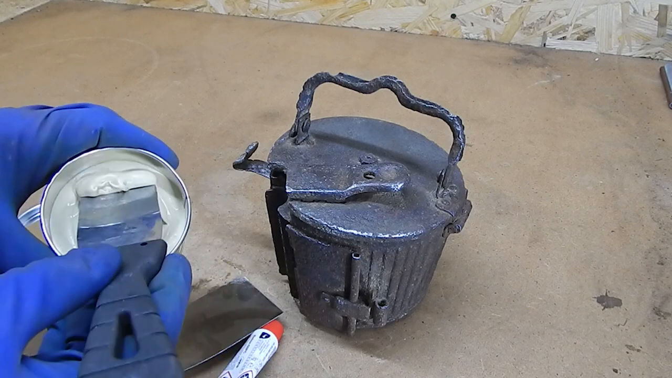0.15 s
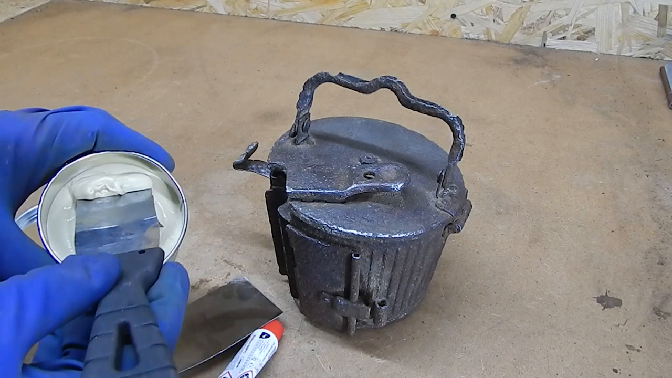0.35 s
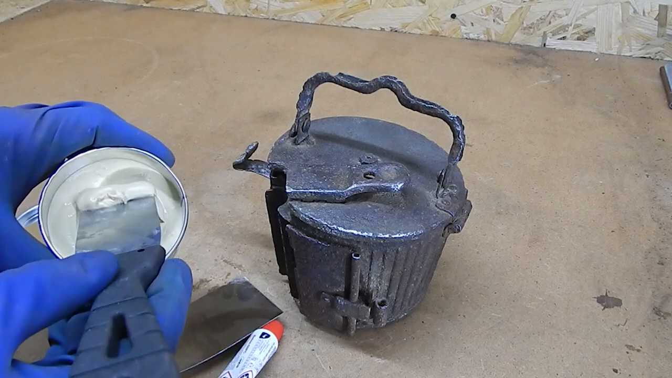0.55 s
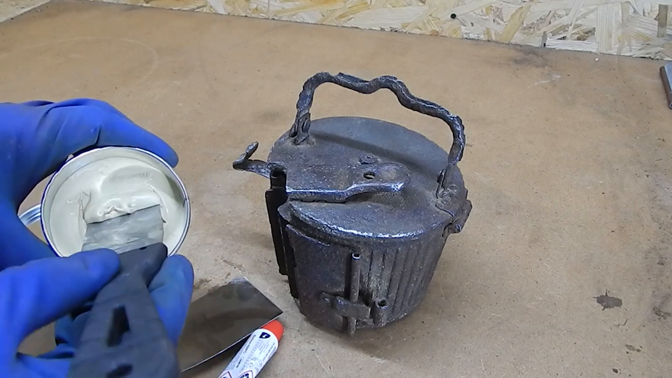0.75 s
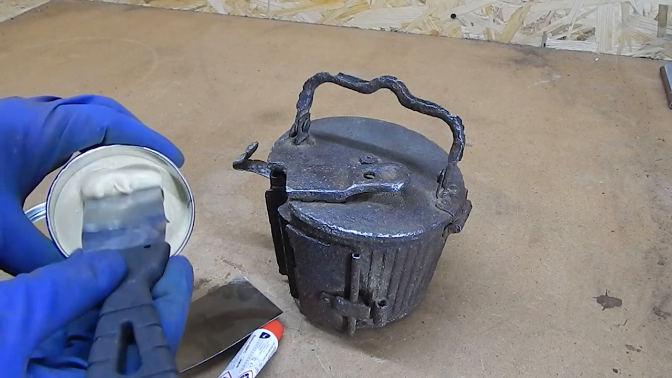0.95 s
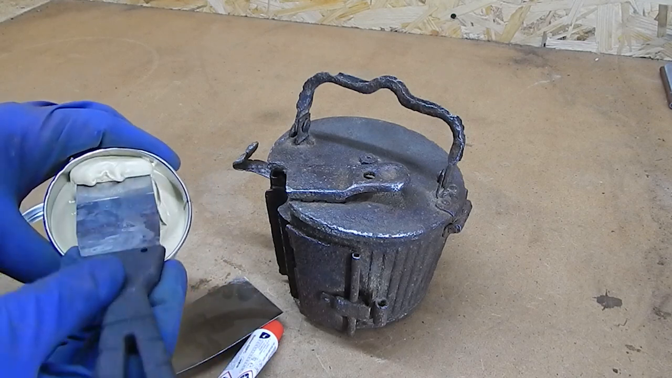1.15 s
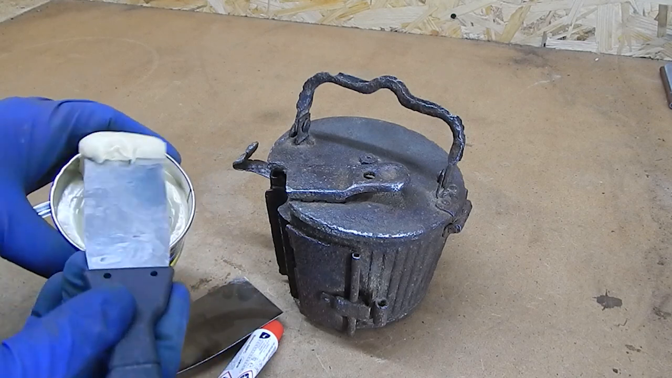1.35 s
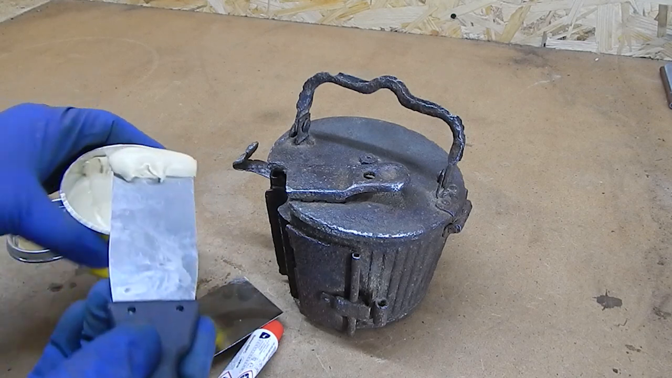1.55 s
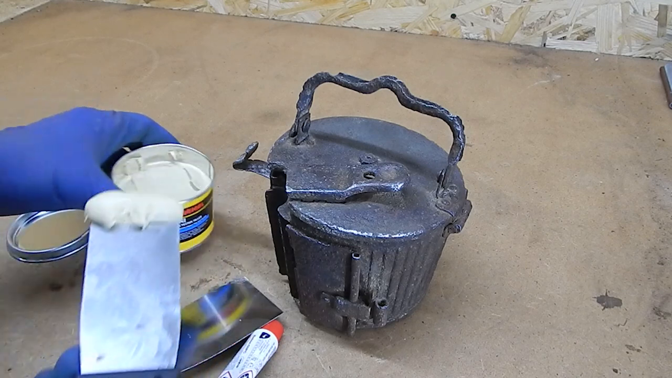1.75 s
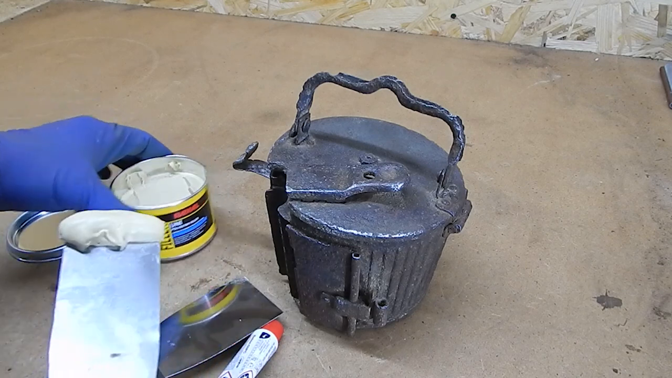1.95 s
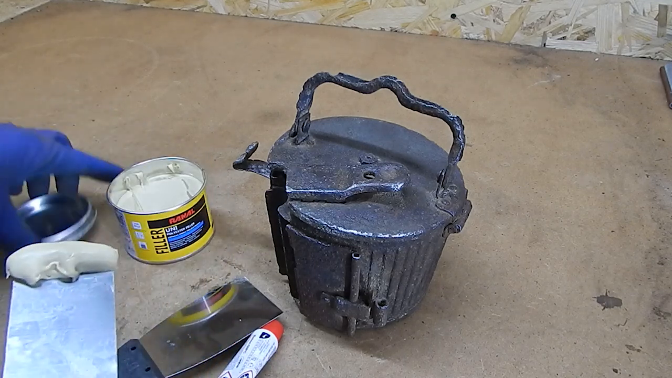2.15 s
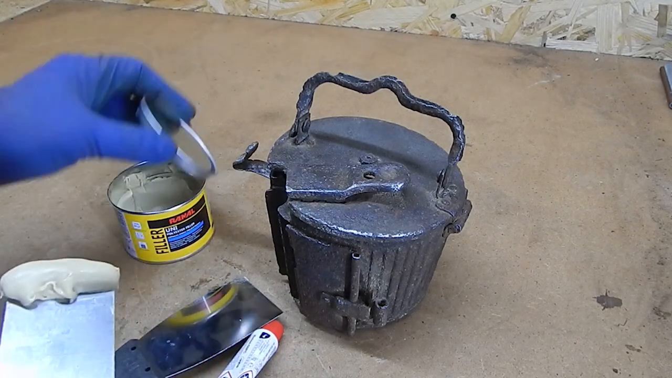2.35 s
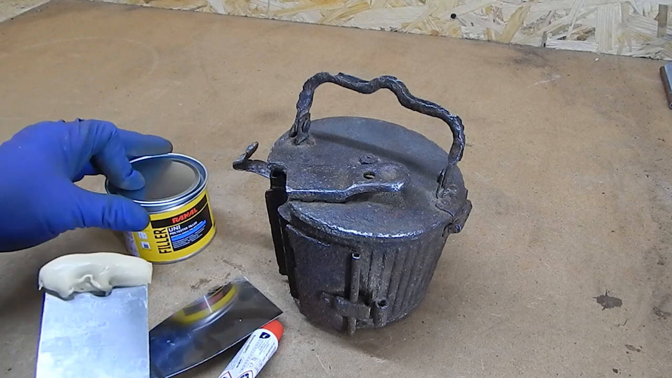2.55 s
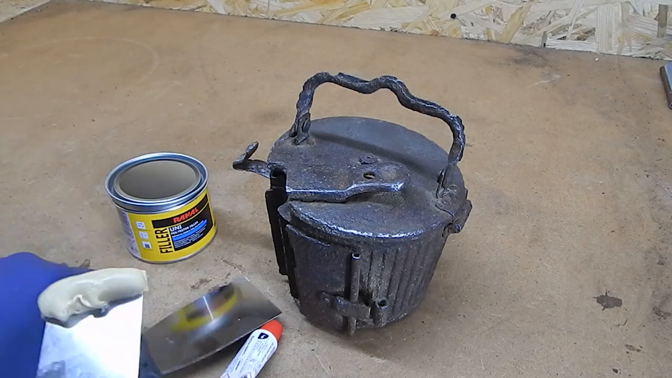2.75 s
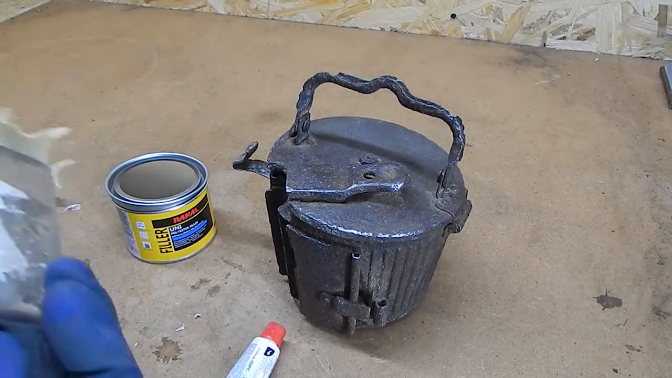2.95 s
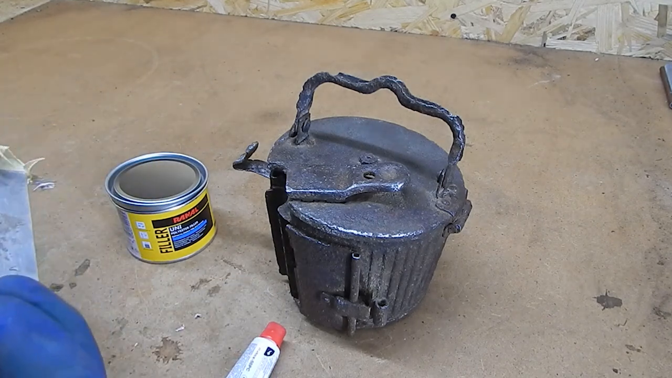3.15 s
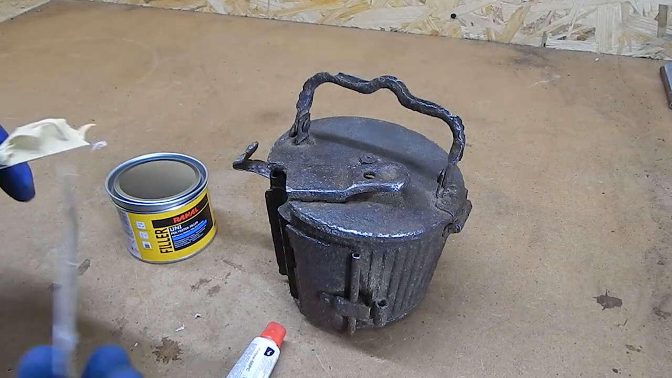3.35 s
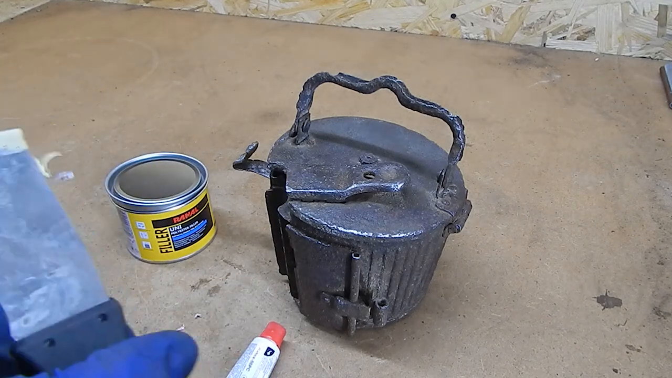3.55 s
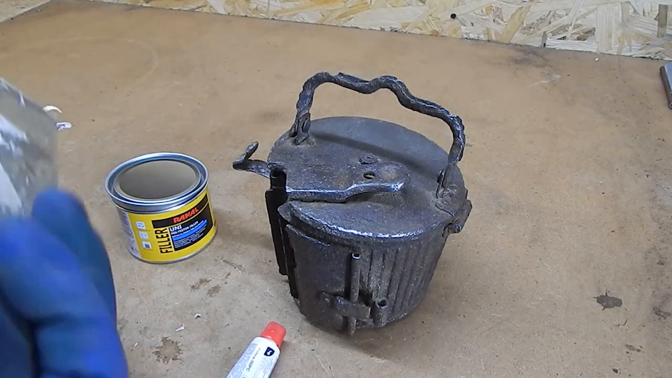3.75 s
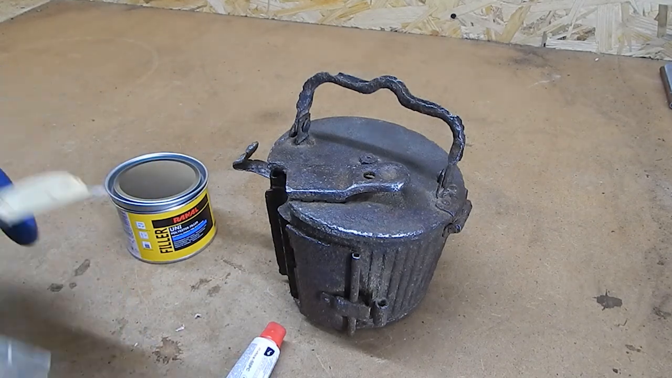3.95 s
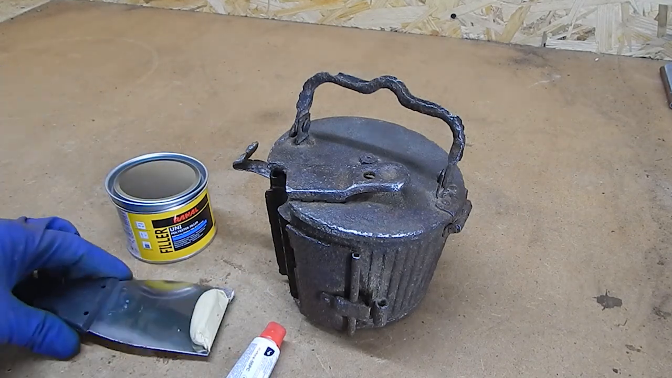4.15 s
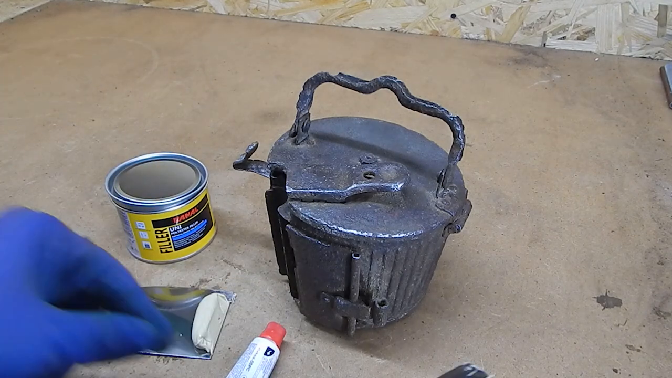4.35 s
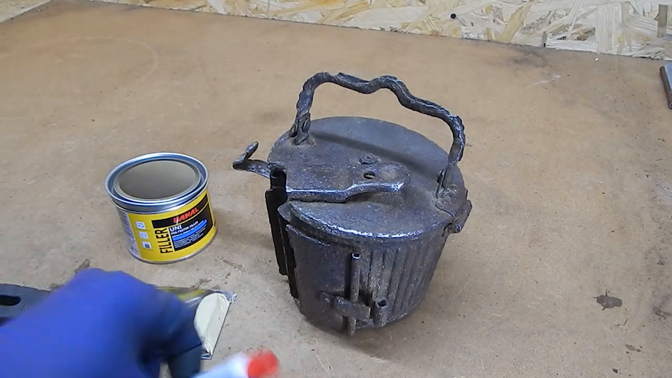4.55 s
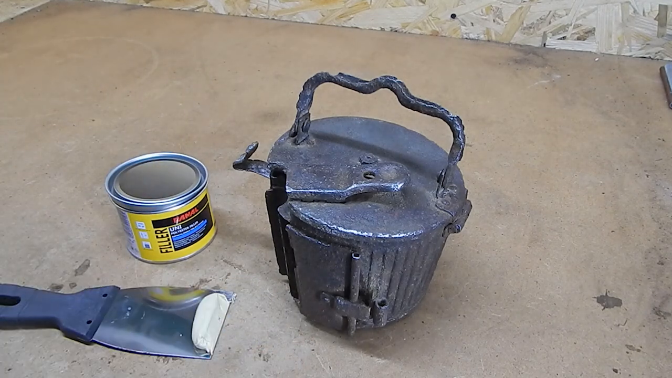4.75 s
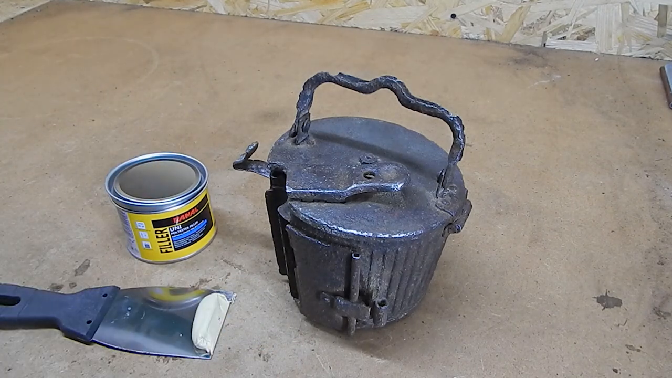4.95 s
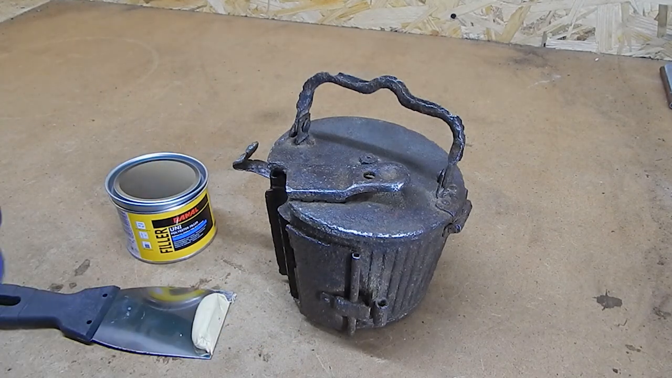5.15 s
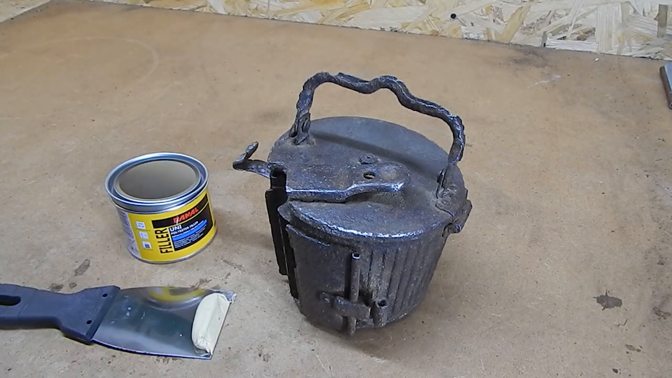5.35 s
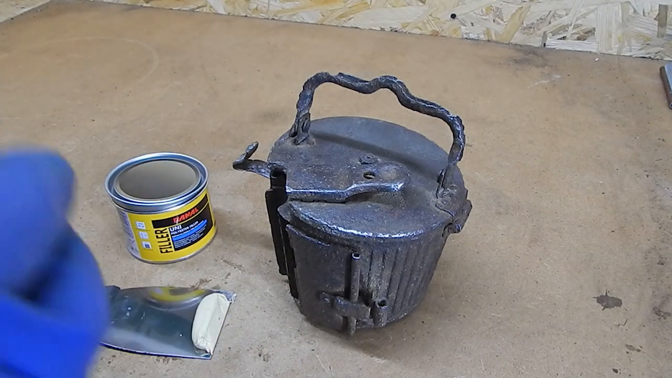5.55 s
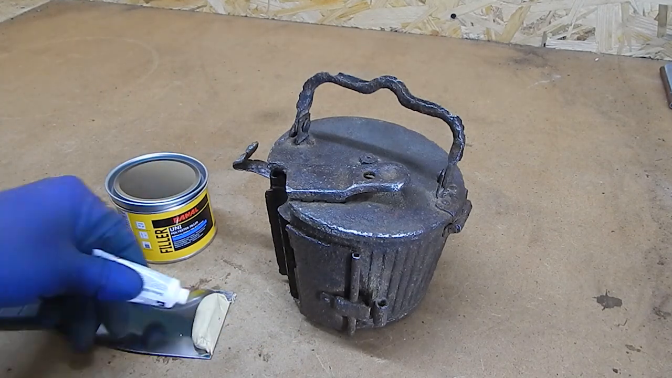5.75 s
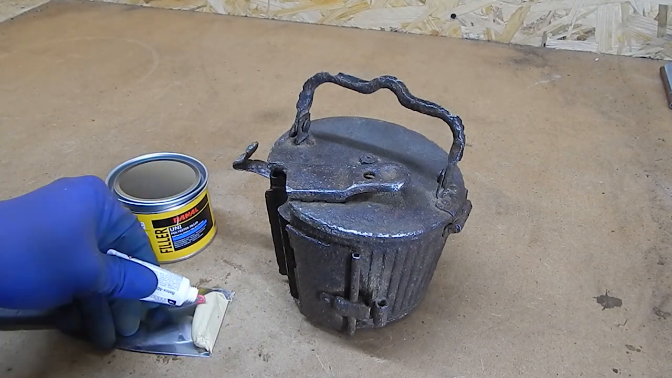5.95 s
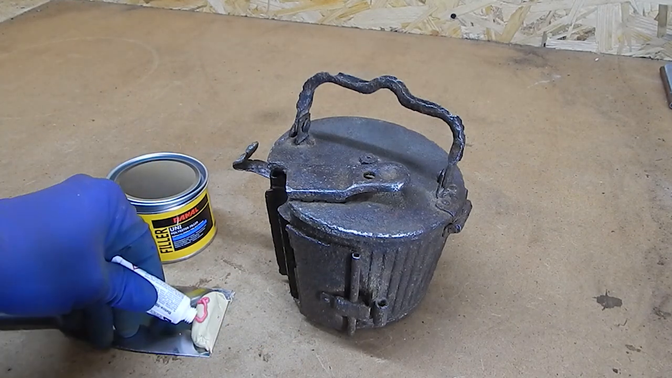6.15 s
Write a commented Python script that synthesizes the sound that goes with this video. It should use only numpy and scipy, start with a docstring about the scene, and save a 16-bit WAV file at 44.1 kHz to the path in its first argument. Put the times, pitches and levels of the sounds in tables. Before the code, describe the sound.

Light metallic clinks, scrapes and knocks as a tin, a lid and putty knives are handled on a wooden bench in a quiet workshop.

```python
"""A filler tin, its lid and two putty knives clatter at a wooden bench: a gloved hand scoops from the tin,
sets tin and lid down, wipes the knives together and lays one down. Each contact is a burst of noise
plus the ringing tones of the thing touched. Gloves scuff and rustle, and the walls echo briefly.
Behind it are workshop air and soft low bumps. From two seconds on this background sounds sped up:
the air is brighter and flickers more, and the bumps are higher and shorter."""
import sys
import numpy as np
from scipy import signal
from scipy.fft import rfft, irfft, next_fast_len
from scipy.io import wavfile
from scipy.ndimage import uniform_filter1d

SR = 44100
rng = np.random.default_rng(int(sys.argv[2]) if len(sys.argv) > 2 else 0)


def int16_out(signal):
    """Quantize to a 16-bit WAV file."""
    q = np.round(np.clip(np.atleast_2d(signal).T, -1, 1) * 32767)
    wavfile.write(sys.argv[1], SR, q.astype(np.int16))


N = 272979
T = np.arange(N) / SR
FASTER_AT_S, SPEED = 2.012, 3.0  # when the background speeds up, and by how many times


def undb(db):
    """Turns decibels into a factor to multiply by."""
    return 10 ** (np.asarray(db) / 20)


def on_log(hz, table):
    """Reads between the rows of a (Hz, value) table, giving every octave equal room."""
    table_hz, values = np.transpose(table)
    return np.interp(np.log(hz), np.log(table_hz), values)


def band(x, hz, width):
    """Keeps the frequencies around hz; the top edge is 1 + width times the bottom edge."""
    ratio = 1 + max(width, .05)
    edges = [hz / np.sqrt(ratio), min(hz * np.sqrt(ratio), .45 * SR)]
    return signal.sosfilt(signal.butter(1, edges, "band", fs=SR, output="sos"), x)


def swell(t, rise, fade):
    """Builds up until t = 0, then dies away. A fade time is the time taken to drop 60 dB."""
    growing = np.exp(np.minimum(t, 0) / max(rise, 1e-4))
    dying = undb(-60 * np.maximum(t, 0) / np.maximum(fade, 1e-3))
    return np.where(t < 0, growing, dying)


def add(out, x, start_s, db, pan_db=0):
    """Mixes x in with its loudest 4 ms at db; pan_db is the left level minus the right."""
    loudest = np.sqrt(uniform_filter1d(x ** 2, SR // 250).max())
    at = int(start_s * SR)
    left = x[:N - at] * undb(db) / loudest
    right = np.roll(left, int(rng.random() < .75))  # most sounds reach the right a sample later
    out[:, at:at + len(left)] += np.array([left, right]) * undb([[pan_db / 2], [-pan_db / 2]])


def wander(rate):
    """Glides to a new random value rate times a second."""
    step = int(SR / rate)
    return uniform_filter1d(np.repeat(rng.standard_normal(N // step + 1), step), step)[:N]


def grit(count, spread_db):
    """Noise with scattered strong grains, as from a slipping contact."""
    return rng.standard_normal(count) * undb(spread_db * rng.exponential(size=count))


def air(spectrum, db, pace, flicker_db):
    """Room noise, partly alike left and right in the bass; its lows and highs flicker separately."""
    # Each row: frequency in Hz at pace 1, how alike the two sides are from 0 to 1.
    side_likeness = [(60, 0.32), (290, 0.51), (640, 0.32), (1400, 0.28), (3100, 0.058), (7000, 0.01)]
    size = next_fast_len(N)
    hz = np.arange(size // 2 + 1) * SR / size + 1
    alike = np.clip(on_log(hz / pace, side_likeness), 0, 1)
    noise = rfft(rng.standard_normal((2, size))) * undb(on_log(hz, spectrum))
    mid, side = noise * np.sqrt([1 + alike, 1 - alike])
    stereo = np.array([mid + side, mid - side])
    low = 1 / (1 + (hz / (250 * pace)) ** 4)
    out = sum(irfft(stereo * part, size)[:, :N] * undb(share * flicker_db * wander(9 * pace))
              for part, share in ((low, 1), (1 - low, .3)))
    return out * undb(db) / np.sqrt(np.mean(out ** 2))


def workshop_air():
    """Calm room noise gives way to a brighter, more restless one."""
    # Each row of both: frequency in Hz, relative strength there in dB.
    calm_spectrum = [(18, -54), (30, -19), (131, -8), (233, -13), (415, 3), (649, -6.5), (1220, -5.5),
                     (1350, -9), (2540, -16), (2980, -16.5), (7670, -37.5), (12300, -58), (16000, -80)]
    fast_spectrum = [(18, -50), (40, -20), (86, -18), (150, -17.5), (259, -5), (500, -9), (866, -10),
                     (1100, 1), (1250, 3), (1590, -3.5), (2830, -6.5), (3670, -7), (4200, -11), (7090, -16),
                     (14400, -30), (16000, -42)]
    calm = air(calm_spectrum, db=-56.5, pace=.856, flicker_db=.8)
    fast = air(fast_spectrum, db=-56, pace=SPEED, flicker_db=5.5)
    blend = np.clip((T - FASTER_AT_S) / .0075, 0, 1)
    return (1 - blend) * calm + blend * fast


def faint_bumps(count=60, gap_s=.33):
    """Lists times and levels of loosely spaced faint bumps, closer together at the faster pace."""
    timing, strength = rng.random((count, 2)).T
    unhurried = (np.arange(count) + timing) * gap_s
    starts = np.where(unhurried < FASTER_AT_S, unhurried, FASTER_AT_S + (unhurried - FASTER_AT_S) / SPEED)
    db = -58.5 + 3 * (2 * strength - 1)
    return list(zip(starts, db))[:np.searchsorted(starts, N / SR)]


def bumps():
    """Short dull lumps of bass; higher and shorter at the faster pace."""
    # Each row: start in seconds, level in dB.
    clear_bumps = [(.173, -51), (0.244, -52.5), (.621, -55.5), (.84, -56), (1.174, -55), (1.577, -58),
                   (1.809, -55), (1.9, -54.5), (2.193, -53), (2.248, -55.5), (2.339, -55), (2.598, -52.5),
                   (2.663, -54), (2.859, -54), (2.928, -57.5), (3.266, -58), (3.445, -57.5), (3.502, -55),
                   (3.539, -56.5), (3.896, -53), (3.975, -53.5), (4.087, -53.5), (4.687, -55.5),
                   (4.749, -54.5), (4.811, -54.5), (4.917, -57.5), (5.02, -56), (5.3, -54.5), (5.377, -54),
                   (5.464, -55.5), (5.493, -55), (5.563, -53), (5.706, -57), (5.816, -55), (5.995, -53),
                   (6.119, -58)]
    out = np.zeros((2, N))
    for start_s, db in clear_bumps + faint_bumps():
        pace = SPEED if start_s > FASTER_AT_S else 1
        hz, width = 107.6 * pace, 1.27
        t = np.arange(int(.15 * SR / pace)) * pace / SR
        lump = rng.standard_normal(len(t)) * t * np.exp(-t / .012)
        add(out, band(band(lump, hz, width), hz, width), start_s, db)
    return out


def glove_rustle():
    """Thin hiss of the gloves, unrelated left and right."""
    # Each row: time in seconds, level in dB.
    rustle_levels = [(0, -71), (1.95, -70), (2.6, -62.5), (3.0, -61), (3.8, -67), (4.6, -59), (4.85, -65),
                     (5.43, -61), (5.95, -69), (6.19, -68)]
    flicker = undb(1.5 * wander(20))
    hiss = band(rng.standard_normal((2, N)), hz=5900, width=5.4) * flicker
    return hiss / np.std(hiss) * undb(np.interp(T, *np.transpose(rustle_levels)))


def reflections(db, fade_s, hz, width):
    """Two unrelated bursts of tiny echoes, one for each side."""
    t = np.arange(SR // 5) / SR
    burst = band(rng.standard_normal((2, len(t))) * undb(-60 * t / fade_s), hz, width)
    return burst * undb(db) / np.sqrt(np.sum(burst ** 2, axis=1, keepdims=True))


def room_echo(x):
    """Walls answer briefly; moving hands and tools scatter treble to one side at the other's cost."""
    mid = x.mean(axis=0)
    walls = reflections(db=-12, fade_s=.15, hz=5960, width=15)
    out = signal.fftconvolve(mid[None], walls, axes=1)[:, :N]
    step = int(.12 * SR)  # the scattering changes this often
    treble = dict(hz=12800, width=3.2)
    for at in range(0, N, step):
        scatter = band(reflections(db=-3, fade_s=.0012, **treble)[0], **treble)[:256]
        side = np.convolve(mid[at:at + step], scatter)[:N - at]
        out[:, at:at + len(side)] += side * [[1], [-1]]
    return out


def scuffs():
    """Gritty scuffs of glove or steel, and brief narrow rings of lid and blades."""
    # Each row: loudest moment in seconds, level in dB, centre in Hz, band width, fade time in seconds.
    scuffs_and_rings = [(.735, -62.5, 10600, .7, 0.38), (1.217, -64.5, 8000, 1.5, 0.083),
                        (1.45, -60.5, 8500, 1.5, 0.22), (1.525, -42.5, 8000, 1.1, 0.17),
                        (1.524, -47, 6600, 0.24, .11), (1.81, -60, 10500, 1.2, .3),
                        (2.018, -48, 2160, 0.89, 0.066), (2.063, -47.5, 6700, 1.1, 0.088),
                        (2.097, -49, 8000, 1.4, 0.033), (2.223, -44, 11000, 1.8, 0.056),
                        (2.562, -45, 3750, 0.18, .04), (2.576, -42.5, 3750, .15, 0.045),
                        (2.588, -43, 3700, 0.1, 0.037), (2.63, -42.5, 3360, 0.087, 0.06),
                        (2.873, -39, 10000, 2.7, 0.061), (2.916, -48, 8840, 1.6, 0.14),
                        (2.942, -45, 4830, 0.21, .1), (3.169, -41.5, 11000, 2.1, 0.037),
                        (3.374, -43.5, 3050, 4.2, 0.085), (3.384, -36, 8700, 1.6, 0.047),
                        (3.572, -46, 8400, 0.6, 0.039), (3.694, -40.5, 4140, .11, 0.023),
                        (3.731, -39.5, 6940, 6.9, .07), (3.841, -41.5, 8700, 14, 0.037),
                        (3.948, -47, 3600, 0.15, 0.048), (3.948, -46, 6540, .14, 0.039),
                        (3.965, -47.5, 4600, .2, .03), (4.003, -49.5, 6630, .15, 0.074),
                        (4.038, -33, 7860, 0.9, .058), (4.55, -56, 6000, 1.4, 0.2),
                        (4.648, -47.5, 5670, 0.9, 0.04), (4.674, -55, 5200, 0.5, 0.053),
                        (4.773, -47.5, 4600, 1.5, .08), (5.241, -40, 7760, 8.4, 0.049),
                        (5.25, -43.5, 5700, 0.65, 0.059), (5.339, -55.5, 9000, 0.57, 0.064),
                        (5.372, -44.5, 8300, .9, 0.029), (5.45, -54, 7760, 1.1, .07),
                        (5.48, -54.5, 7700, .68, .09), (5.522, -46.5, 6370, 0.91, .04),
                        (5.577, -49, 7800, 3.6, 0.055), (5.619, -51.5, 6550, 2.6, .027),
                        (5.977, -52.5, 8360, 0.65, 0.028)]
    out, t = np.zeros((2, N)), np.arange(SR // 2) / SR
    for peak_s, db, hz, width, fade in scuffs_and_rings:
        rise = .115 * fade
        lead = 4 * rise
        burst = band(grit(len(t), spread_db=2.74), hz, width) * swell(t - lead, rise, fade)
        add(out, burst, peak_s - lead, db)
    return out


def blows(hits, tones, clatter, ring_length, snap_db, pan_db, lowest_hz):
    """Each blow makes a snap, a noisy clatter whose treble dies first, and the thing's ringing tones."""
    # Each row of hits: time in seconds, level in dB, build-up in seconds, clatter fade time at 1 kHz
    # in seconds, treble tilt in dB per octave, ringing compared with clatter in dB.
    # Each row of tones: pitch in Hz, relative level in dB, fade time in seconds before stretching.
    # Each row of clatter: frequency in Hz, relative strength there in dB.
    out, t = np.zeros((2, N)), np.arange(8192) / SR
    tone_hz, tone_db, tone_fade = np.array(tones).T[:, :, None]
    hz = np.arange(len(t) // 2 + 1) * SR / len(t) + 1
    centres = 50 * 2. ** np.arange(0, 9, .5)[:, None]
    bands = np.clip(1 - 2 * np.abs(np.log2(hz / centres)), 0, 1)  # overlapping half-octave slices
    bass_lingers = (1000 / centres) ** .44
    octaves, tone_octaves = (np.log2(np.maximum(f, 3 * lowest_hz) / 1000) for f in (hz, tone_hz))
    for time_s, level_db, rise, fade, tilt_db, ring_db in hits:
        lead = 4 * rise
        colour = undb(on_log(hz, clatter) + tilt_db * octaves)
        slices = irfft(rfft(grit(len(t), spread_db=1.6)) * colour * bands, len(t))
        noise = (slices * swell(t - lead, rise, fade * bass_lingers)).sum(axis=0)

        level_jitter, pitch_jitter = rng.standard_normal((len(tones), 2)).T[:, :, None]
        gain = undb(tone_db + tilt_db * tone_octaves + 2 * level_jitter)
        waves = np.sin(2 * np.pi * tone_hz * (1 + .0024 * pitch_jitter) * (t - lead))
        stretch = ring_length * undb(.067 * (level_db + 22))  # the hand still damps a light touch
        ring = (gain * waves * swell(t - lead, rise, stretch * tone_fade)).sum(axis=0)

        snap = np.roll(irfft(colour, len(t)), int(lead * SR)) * (t < .02)  # first touch: one clean pulse
        snap_gain = undb(snap_db - 8.5 * np.log2(rise / .001))  # a shorter contact snaps harder
        blow = noise / np.std(noise) + undb(ring_db) * ring / np.std(ring) + snap_gain * snap / np.std(snap)
        add(out, blow, time_s - lead, level_db, pan_db)
    # a thing smaller than the sound wave gives off little bass
    return signal.sosfilt(signal.butter(2, lowest_hz, "high", fs=SR, output="sos"), out)


def rim_slips():
    """Scooping slips against the tin's rim, which rings faintly."""
    # The slips, the rim's tones and its clatter; blows() lists the columns.
    hits = [(1.424, -57, .0015, 0.28, 1, -11), (1.454, -48, .0022, 0.21, -2, 1),
            (1.475, -46.5, .0018, 0.34, 0, -1), (1.499, -42, .0015, .061, 0, 2.5),
            (1.513, -42.5, .0014, 0.16, 4, -5)]
    tones = [(1880, -5, 0.034), (2070, -1, 0.06), (2140, -3, 0.05), (2990, -14, 0.027), (6950, -14, 0.046),
             (9000, -14, .04)]
    clatter = [(500, -42), (1500, -12), (1800, -5), (2100, -1), (2400, -23), (3000, -12.5), (6000, -30),
               (16000, -20)]
    return blows(hits, tones, clatter, ring_length=1.4, snap_db=-20, pan_db=-1.7, lowest_hz=600)


def tin_on_bench():
    """The tin lands on the wooden bench with a low knock."""
    # The landings, the tones of tin on wood and their clatter; blows() lists the columns.
    hits = [(2.0255, -23, 0.00035, 0.14, 1.7, -2), (2.061, -38, .0019, 0.05, .5, -8),
            (2.1045, -25.5, .0006, 0.073, 4.3, 5.5)]
    tones = [(60, -18, 0.074), (131, 2.5, 0.15), (154, -1.5, 0.19), (327, -3, 0.18), (422, -6, 0.18),
             (900, -15, 0.051), (1147, 2.5, 0.029), (1820, -20, 0.022)]
    clatter = [(24, -37), (40, -40), (127, 0), (262, 3.5), (412, 6), (751, -7.5), (873, -5), (1950, -7.5),
               (2700, -16), (6820, -34.5), (16000, -48)]
    return blows(hits, tones, clatter, ring_length=.85, snap_db=-42, pan_db=-2.4, lowest_hz=53.6)


def blade_on_blade():
    """Two putty knives click and ring as they are wiped together."""
    # The clicks, the blades' tones and their clatter; blows() lists the columns.
    hits = [(3.388, -28.5, .0013, 0.04, 2, 6.5), (3.693, -32, 0.00061, 0.077, 2, -32),
            (3.741, -35, 0.00059, 0.047, -1.5, -8.5), (3.8115, -45, 0.00064, 0.12, -0.5, -21),
            (3.946, -46.5, .00092, 0.06, 1.5, -20), (3.963, -50, 0.00046, .084, 5, -6),
            (4.002, -48, .0008, 0.16, 3, -15), (4.043, -27.5, 0.0014, 0.031, 2, 6)]
    tones = [(1150, -9, .06), (3768, -12, .03), (5324, 0, .095), (6853, -1, .05), (9300, -12, .025)]
    clatter = [(88, -45), (150, -10.5), (361, -4.5), (759, -20), (1140, 3.5), (1500, -16), (4160, -5),
               (4950, -7.5), (6140, -7.5), (16000, -11.5)]
    return blows(hits, tones, clatter, ring_length=.69, snap_db=-13, pan_db=-.59, lowest_hz=226)


def knife_on_bench():
    """A knife and a tube knock against the bench."""
    # The knocks, the tones of knife on wood and their clatter; blows() lists the columns.
    hits = [(2.839, -48.5, 0.00091, 0.25, -2.5, -23), (2.888, -40.5, .0006, 0.084, -2, -6),
            (2.902, -47, 0.0013, .12, 2, -1), (4.3395, -23, 0.00081, .097, 1.5, .5),
            (4.3765, -37.5, 0.0023, 0.22, -1, 4), (4.423, -25, .0007, .097, -1, -1.5),
            (4.485, -44.5, .0016, 0.49, -1, -8), (4.5265, -27, 0.00037, 0.096, 2, -21),
            (4.578, -31.5, 0.00088, 0.083, 1, -15), (4.589, -30.5, 0.0017, 0.12, 0, -3.5),
            (4.660, -44, 0.0021, 0.11, -1, -2), (5.1655, -38, 0.00029, 0.015, -7.5, -7)]
    tones = [(644, -14, 0.014), (1100, 4, 0.069), (1454, -2.5, 0.079), (1670, 0.5, 0.058),
             (2280, -1.5, 0.033)]
    clatter = [(47, -55), (80, -30), (242, -6), (289, -12), (550, -3.5), (820, -7), (1090, 1.5),
               (1670, -4.5), (1820, -12), (2970, -9), (12500, -23), (16000, -31)]
    return blows(hits, tones, clatter, ring_length=.75, snap_db=-25, pan_db=-1.9, lowest_hz=186)


def lid_on_bench():
    """The lid rattles and rings brightly as it is set down."""
    # The contacts, the lid's tones and its clatter; blows() lists the columns.
    hits = [(2.226, -39, 0.0024, 0.059, -7, -12), (2.4825, -23, .00085, 0.067, 0.5, 5),
            (2.5195, -19, .0007, 0.065, 1.5, -2), (2.526, -26, 0.0012, 0.12, 1, -12),
            (2.563, -46, .0011, 0.083, -8, -12), (2.5765, -39, 0.00063, 0.1, -1.5, -21),
            (2.588, -50, .0008, 0.041, 3, -17), (2.630, -39, .0022, 0.14, -3.5, -16),
            (2.6465, -34.5, .0037, 0.083, -5, -2), (2.729, -40, 0.001, 0.059, -8, -6),
            (2.739, -44.5, 0.0013, .064, -12, 12), (3.101, -40.5, 0.00064, .042, -0.8, -11)]
    tones = [(1260, -3.5, 0.074), (1690, -10, .05), (2462, 1, 0.062), (2310, 4, 0.042), (2410, 5, 0.079),
             (3470, -3, 0.019), (3670, -15, 0.11), (4860, -8, 0.024), (5470, -13, 0.2), (6150, -5, 0.06),
             (5660, -19, .05), (6770, 5, 0.04), (6450, -7, .045), (6710, -5, 0.059), (6860, -8, 0.1),
             (9500, 0, 0.066), (12700, -12, 0.038), (15220, -20, .04)]
    clatter = [(47, -55), (80, -19.5), (190, -18), (575, -18.5), (820, -22), (1220, 2.5), (1370, -7),
               (1950, -13.5), (2330, 2.5), (3030, -29), (3700, -10.5), (6590, -1.5), (7360, -19.5),
               (9400, -13.5), (16000, -19)]
    return blows(hits, tones, clatter, ring_length=.99, snap_db=-22, pan_db=-2.6, lowest_hz=170)


def scene():
    """The work at the bench and its echo, over the background."""
    work = rim_slips() + tin_on_bench() + lid_on_bench() + blade_on_blade() + knife_on_bench() + scuffs()
    return workshop_air() + work + room_echo(work) + glove_rustle() + bumps()


def record(dry):
    """The sound has a narrow dip near 7.5 kHz and a lift near 15 kHz; the top is cut steeply."""
    dipped = dry - .5 * signal.lfilter(*signal.iirpeak(7550, 25, fs=SR), dry)
    lifted = dipped + .063 * signal.lfilter(*signal.iirpeak(15000, 6, fs=SR), dipped)
    return signal.sosfilt(signal.ellip(10, .2, 75, 15900, fs=SR, output="sos"), lifted)


dry = scene()
out = record(dry)
int16_out(out)
```